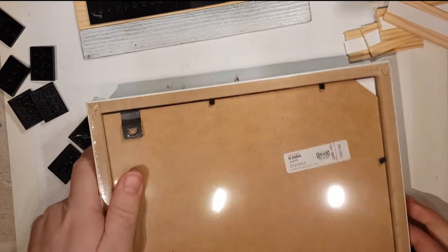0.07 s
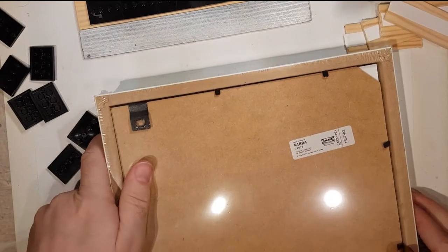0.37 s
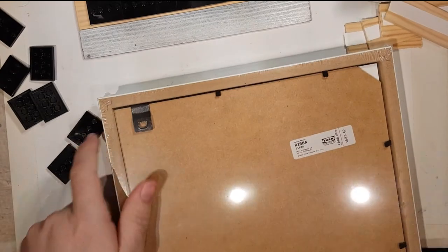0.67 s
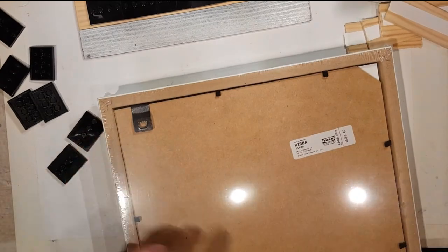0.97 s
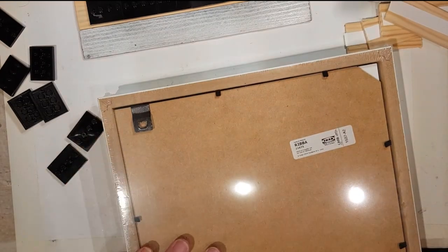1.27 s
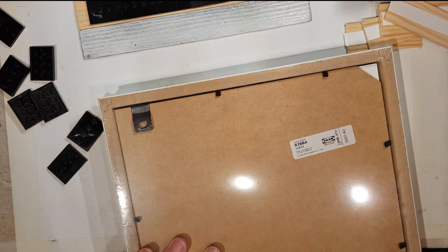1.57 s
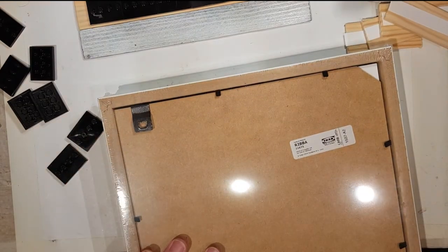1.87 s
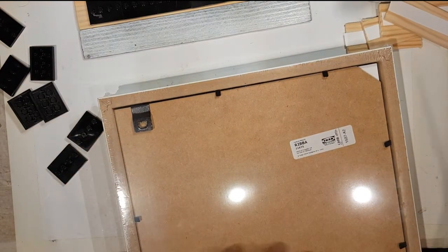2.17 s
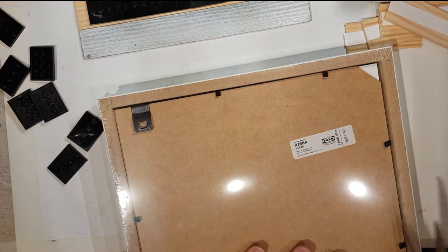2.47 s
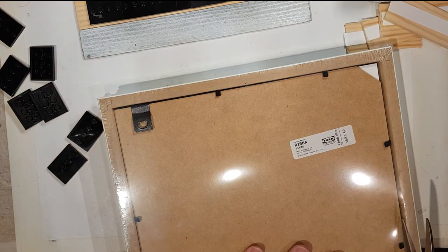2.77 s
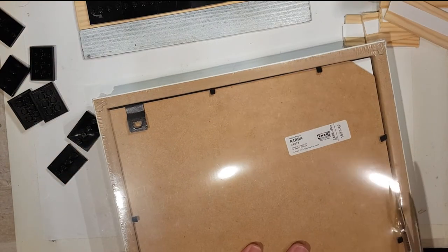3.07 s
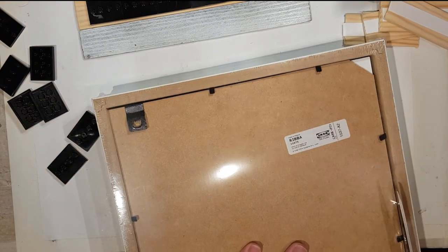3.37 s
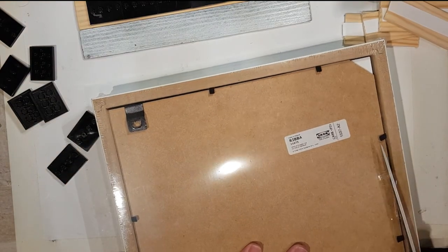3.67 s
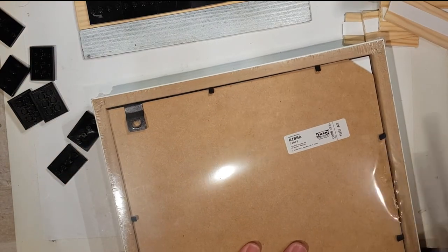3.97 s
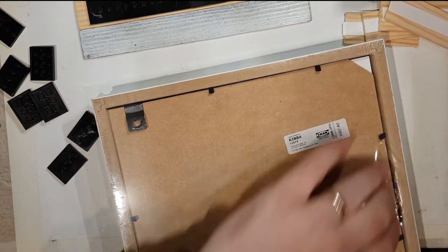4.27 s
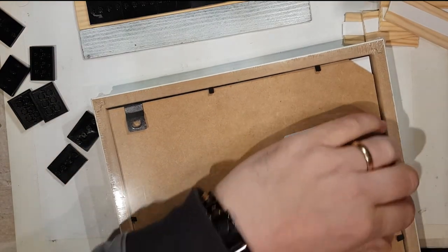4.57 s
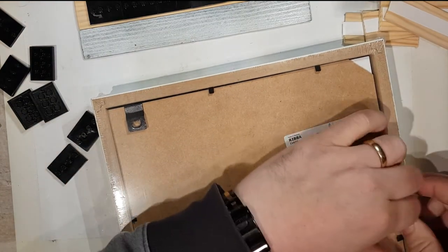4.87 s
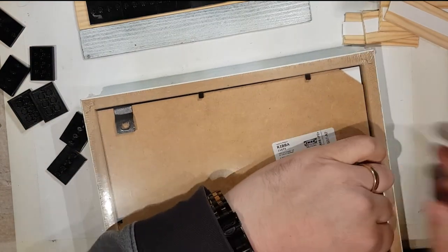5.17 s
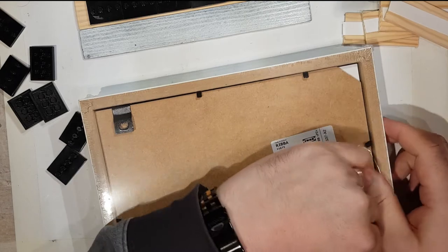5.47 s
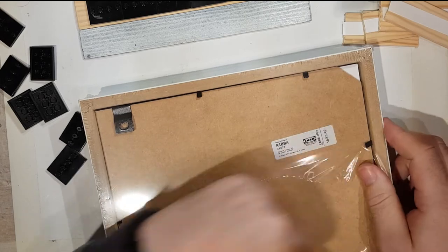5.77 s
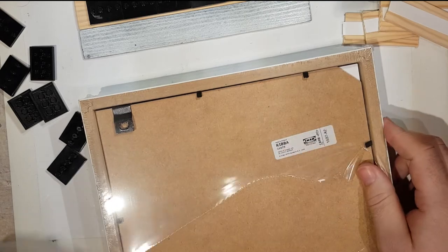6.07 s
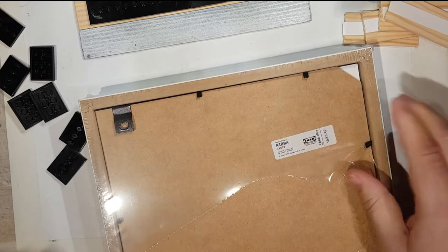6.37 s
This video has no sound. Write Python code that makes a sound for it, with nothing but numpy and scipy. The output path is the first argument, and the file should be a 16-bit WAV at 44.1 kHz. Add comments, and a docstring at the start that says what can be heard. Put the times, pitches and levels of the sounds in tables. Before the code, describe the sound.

Plastic film rustles briefly, and a shrink-wrapped wooden picture frame knocks a few times as it is laid on a table. Lighter taps follow. Fingers rub and pick at the taut wrap, which crackles and gives small sharp snaps, growing busier. Near the end a strip tears in one quick rip that shakes the loose sheet. Everything is heard close up in a small, quiet room.

```python
"""Plastic film rustles under someone's hands, then a shrink-wrapped wooden picture frame knocks
as it is laid face down on a table, close by in a small room. Frame and backing board ring at each
blow. Fingers rub and pick at the taut film until its creases snap. Near the end a strip of film
is torn across the back in a quick run of slips that shake the loose sheet."""
import sys
import numpy as np
from scipy import signal
from scipy.fft import rfft, irfft, next_fast_len
from scipy.io import wavfile

SR = 44100
rng = np.random.default_rng(int(sys.argv[2]) if len(sys.argv) > 2 else 0)


def unload_audio(sound):
    """Save the sound as a 16-bit wav file, at the path given as the first command line argument."""
    columns = np.transpose(np.atleast_2d(sound))
    # keep every value between -1 and 1, then stretch to whole-number steps
    steps = np.round(np.clip(columns, -1, 1) * 32767)
    wavfile.write(sys.argv[1], SR, steps.astype(np.int16))


N = 283122
TIME = np.arange(N) / SR
SIZE = 2 ** 14  # samples in one blow and its ring
AGE = np.arange(SIZE) / SR  # seconds since a blow
BLOW_GAIN = np.sqrt(.03 * SR)  # a blow's level counts its energy as if spread over 30 ms
TEAR_START_S, TEAR_END_S = 5.58, 6.22

# edges of the six bands, bass to treble, that shape a blow: (frequency [Hz])
BAND_EDGES = [50, 200, 450, 1100, 3000, 8000, 16000]
# how unlike left and right are in scattered sound: (frequency [Hz], side over middle [dB])
STEREO_WIDTH = [(60, -16.5), (270, -10.5), (500, -8), (1000, -1.5), (4000, 0)]
# how board and room colour each knock and snap: (frequency [Hz], gain [dB])
BOARD_COLOUR = [(30, -11), (100, -6), (2800, 5.5), (4700, 7), (7300, 2.5), (9200, -4.5), (13000, -9.5),
                (16000, -20.5)]


def undb(db):
    """Turn decibels into a gain."""
    return 10 ** (np.asarray(db) / 20)


def unit(x):
    """Scale a sound to an average power of 1."""
    return x / np.sqrt(np.mean(x ** 2))


def unit_energy(x):
    """Scale a sound to a total energy of 1, averaged over its channels."""
    return unit(x) / np.sqrt(x.shape[-1])


def along(points, hz):
    """Read between (frequency, value) points, with octaves evenly spaced."""
    point_hz, value = np.transpose(points)
    return np.interp(np.log(np.maximum(hz, 1)), np.log(point_hz), value)


def colour(x, points):
    """Filter a sound by a curve of (frequency [Hz], gain [dB]) points."""
    size = next_fast_len(x.shape[-1] + SIZE // 8) // 2 * 2
    hz = np.arange(size // 2 + 1) * SR / size
    cepstrum = irfft(np.log(undb(along(points, hz))))
    # folding this in half makes the filter ring only after a click, never before it
    cepstrum[1:size // 2] *= 2
    cepstrum[size // 2 + 1:] = 0
    return irfft(rfft(x, size) * np.exp(rfft(cepstrum)))[..., :x.shape[-1]]


def resonate(x, hz, q):
    """Pass a sound through one resonance; a higher q makes it narrower."""
    return signal.lfilter(*signal.iirpeak(min(hz, 15000), max(q, 1), fs=SR), x)


def fade(t60):
    """A level that dies away by 60 dB in t60 seconds."""
    return np.exp(-np.log(1000) * AGE / max(t60, 1e-3))


def add(out, start_s, x):
    """Mix a sound in at a given time."""
    i = int(start_s * SR)
    out[:, i:i + x.shape[-1]] += x[:, :N - i]


def diffuse(size):
    """Stereo noise, alike on both sides in the bass and unrelated in the treble."""
    mid, side = rng.standard_normal((2, size))
    side = colour(side, STEREO_WIDTH)
    return np.array([mid + side, mid - side])


def direct(lag_samples=8):
    """A single click that arrives on the left just before the right."""
    out = np.zeros((2, SIZE))
    out[0, 0] = out[1, lag_samples] = 1
    return out


def tail(stretch=0.99, late_db=-36, late_t60=0.15):
    """The dense ring of board and room, longest in the bass, over a faint reverberation."""
    # how long they ring before stretching: (frequency [Hz], time to fade by 60 dB [s])
    ring_times = [(80, 0.38), (210, 0.24), (560, 0.17), (1470, 0.15), (3880, 0.17), (10200, 0.15)]
    hz = np.arange(SIZE // 2 + 1) * SR / SIZE
    noise, out = rfft(diffuse(SIZE)), 0
    for band_hz, t60 in ring_times:
        share = along([(f, float(f == band_hz)) for f, _ in ring_times], hz)
        out = out + irfft(noise * share) * (fade(t60 * stretch) + undb(late_db) * fade(late_t60))
    return unit_energy(out)


def ring(modes, scatter_db=3, detune=0.017, rise_s=0.00049):
    """An object's fading tones; each touch gives them a slightly different level, pitch and timing."""
    out = 0
    for hz, db, t60 in modes:
        louder, sharper, apart, shift = rng.standard_normal(4)
        phase = np.pi * shift + np.array([[apart], [-apart]]) * undb(along(STEREO_WIDTH, hz))
        tone = np.sin(2 * np.pi * hz * (1 + detune * sharper) * AGE + phase)
        out = out + undb(db + scatter_db * louder) * fade(t60) * tone
    return unit_energy(out * (1 - np.exp(-AGE / rise_s)))


def shape_blow(x, spectrum, db, weight_db, contact_hz, bass_hz=524, softness_slope=4.1):
    """Set a blow's level in each band: weight adds bass, a softer contact takes away treble."""
    edges = np.array(BAND_EDGES)
    centres = np.sqrt(edges[1:] * edges[:-1])
    bass_db = weight_db / (1 + (centres / bass_hz) ** 2)
    dulling_db = 10 * np.log10(1 + (centres / contact_hz) ** softness_slope)
    wanted_db = db + along(spectrum, centres) + bass_db - dulling_db
    for _ in range(3):  # each pass brings the bands closer to their levels
        power = 2 * np.abs(rfft(x.mean(0))) ** 2 / (SIZE * BLOW_GAIN ** 2)
        bands = np.split(power, edges * SIZE // SR)[1:-1]
        now_db = 10 * np.log10([band.sum() for band in bands])
        x = colour(x, np.c_[centres, wanted_db - now_db])
    return x


def in_room(x, direct_db, patchy_db, place_count=12):
    """Clicks heard directly and through board and room; the ring changes as the contact moves."""
    hz = np.geomspace(100, 16000, 44)
    places = []
    for ripple_db in patchy_db * rng.standard_normal((place_count, len(hz))):
        response = undb(direct_db) * direct(lag_samples=4) + tail()
        places.append(unit_energy(colour(response, np.c_[hz, ripple_db])))
    out, step = np.zeros((2, N)), int(.03 * SR)
    for i in range(0, N, step):
        place = places[rng.integers(place_count)]
        if x[i:i + step].any():
            add(out, i / SR, signal.fftconvolve(x[None, i:i + step], place))
    return out


def grains(per_second, spread_db):
    """Tiny random clicks, a few much larger than the rest."""
    size = undb(spread_db * np.minimum(rng.exponential(size=N), 5))
    return (rng.random(N) < per_second / SR) * size * rng.choice([-1, 1], N)


def stroke(start_s, length_s, attack_s=.04, release_t60=0.34):
    """The strength of one hand movement: it gets going, holds, then dies away."""
    attack = np.clip((TIME - start_s) / attack_s + .5, 0, 1)
    since_end_s = np.maximum(TIME - start_s - length_s, 0)
    return attack * np.exp(-np.log(1000) * since_end_s / release_t60)


def room_tone(level_db=-62.5):
    """The faint steady air of the room."""
    # a low hush: (frequency [Hz], gain [dB])
    air_colour = [(25, -12.5), (45, 1.5), (110, 0), (220, -20.5), (700, -18), (1400, -21.5), (5000, -27.5),
                  (13500, -28.5), (16000, -33.5)]
    return unit(colour(diffuse(N), air_colour)) * undb(level_db)


def hands(rumble_db=-1, rub_db=-5, rustle_db=1, strip_db=-35, rub_per_pressure=0.46, strip_per_pull=0.74):
    """Skin drags over the film: fine creases crackle; pressed fingers rub and make the board rumble."""
    # hand movements: (start [s], length [s], level [dB], pressure on the board [dB])
    strokes = [(0.0, 0.01, -41.5, -4.5), (0.057, 0.22, -53.5, -0.5), (0.42, 0.4, -59.5, 2.5),
               (0.85, .22, -73, 9), (1.173, 0.032, -64, 13), (1.825, 0.65, -63.5, -2),
               (2.49, 0.38, -65.5, 2), (2.914, 0.21, -49.5, -3), (3.119, 0.084, -54, 13),
               (3.274, 0.2, -56.5, -30), (3.428, 0.096, -47, -1), (3.492, 0.22, -41.5, -3),
               (3.735, 0.14, -57.5, 18), (3.816, 0.031, -32, -2.5), (3.915, .12, -49, -20),
               (4.321, 0.35, -48.5, 0.5), (4.757, 0.073, -50, 7.5), (4.868, 0.038, -41.5, -0.5),
               (4.916, .19, -40.5, -4.5), (5.02, 0.069, -58, 21.5), (5.218, .07, -50.5, -8.5),
               (5.329, 0.06, -33.5, -16), (5.4, 0.057, -35, 1), (5.521, 0.14, -45.5, -21),
               (6.225, 0.091, -39.5, -15.5)]
    # tone of the board, the skin and the film, each: (frequency [Hz], gain [dB])
    rumble_colour = [(30, -16.5), (45, 2), (100, 1.5), (200, -2.5), (380, -6), (600, -16.5), (1200, -41)]
    rub_colour = [(200, -32.5), (500, -1.5), (1500, 1), (2300, -3), (6000, -34)]
    rustle_colour = [(800, -30), (2000, -11), (4200, 0), (6500, -4.5), (9000, -9), (13000, -9.5),
                     (16000, -16)]
    rumble = rub = rustle = 0
    for start_s, length_s, db, pressure_db in strokes:
        motion = stroke(start_s, length_s) * undb(db)
        rustle = np.hypot(rustle, motion)  # overlapping strokes add their power
        rub = np.hypot(rub, motion * undb(rub_per_pressure * pressure_db))
        rumble = np.hypot(rumble, motion * undb(pressure_db))
    # the loose strip rustles while it is pulled
    strip = stroke(TEAR_START_S, TEAR_END_S - TEAR_START_S) * undb(strip_db + strip_per_pull * pull_db())
    drag = in_room(grains(per_second=1600, spread_db=3), direct_db=-4.5, patchy_db=4.5)
    crackle = in_room(grains(per_second=1600, spread_db=5.5), direct_db=-9.5, patchy_db=-1.0)
    board = unit(colour(drag, rumble_colour)) * rumble * undb(rumble_db)
    skin = unit(colour(drag, rub_colour)) * rub * undb(rub_db)
    film = unit(colour(crackle, rustle_colour)) * np.hypot(rustle * undb(rustle_db), strip)
    return board + skin + film


def knocks(push_db=-19, push_hz=900, tones_db=-8, favoured_t60=.11):
    """Wood meets table or finger with a short push; pane and backing board rattle up and ring out."""
    # blows on the frame: (time [s], level [dB], weight [dB], contact hardness [Hz],
    # favoured tone [Hz], that tone's relative level [dB], rattle build-up [s])
    blows = [(0.162, -25, -2, 3390, 354, 5.5, .003), (0.212, -29, -8, 600, 769, -4, 0.00089),
             (0.356, -32, -2.5, 450, 360, -30, 0.00098), (0.486, -21.5, -5, 7500, 108, -5, 0.0058),
             (0.858, -56, 2.5, 900, 117, 7, 0.0089), (1.305, -39, -7, 8000, 2430, 0, 0.0033),
             (1.354, -37.5, -6, 9500, 1430, -1.5, 0.00095), (1.390, -51, 2.5, 9000, 368, 10.5, 0.0014),
             (1.682, -41, -8, 3110, 112, -2, .0013), (1.695, -33.5, -7.5, 1490, 607, -5.5, 0.02),
             (1.913, -60, 10, 6000, 115, 7.5, 0.0042), (2.982, -42.5, 4.5, 10400, 360, 4, 0.013),
             (3.132, -48.5, 3, 13100, 114, 9, 0.0004), (3.303, -55, 20, 694, 268, 18.5, 0.0065),
             (3.614, -47.5, 18, 3600, 252, 13, .0009), (3.721, -37, 3.5, 3200, 291, 7.5, .0003),
             (3.827, -42.5, 4, 6000, 354, 3, 0.0038), (4.901, -50, 9, 5000, 360, 5, 0.0021),
             (5.014, -37.5, -5.5, 1480, 381, -1.5, 0.00056), (5.095, -60.5, 25.5, 12000, 93, 27.5, 0.017),
             (5.484, -33.5, -3.5, 4200, 359, 11, 0.00027)]
    # tones of frame and backing board: (pitch [Hz], level [dB], time to fade by 60 dB [s])
    frame_tones = [(115.9, -12, 0.35), (193.5, -1.5, 0.12), (360, -3.5, 0.12), (493.6, -7.5, 0.14),
                   (758, -13.5, 0.15), (973, -1, 0.024), (1199, -1, 0.09), (1702, -8.5, 0.25),
                   (1827, -8, 0.22), (2200, 1, 0.09)]
    # a perfectly hard knock: (frequency [Hz], level [dB])
    hard_knock = [(100, 2.5), (300, 0), (700, 1), (1800, -1), (4900, 1.5), (11300, -1)]
    out = np.zeros((2, N))
    push = unit_energy(signal.sosfilt(signal.butter(2, push_hz, fs=SR, output="sos"), direct()))
    for start_s, db, weight_db, hardness_hz, favoured_hz, share_db, build_s in blows:
        rattle = unit_energy(tail(stretch=0.92) * (1 - np.exp(-AGE / build_s)))
        blow = undb(push_db) * push + rattle + undb(tones_db) * ring(frame_tones, detune=0.0092)
        knock = shape_blow(colour(blow, BOARD_COLOUR), hard_knock, db, weight_db, hardness_hz)
        # the spot that is hit favours one tone, which stands out of the dense ring
        favoured = BLOW_GAIN * undb(db + share_db) * ring([(favoured_hz, 0, favoured_t60)], detune=0)
        add(out, start_s, knock + favoured)
    return out


def table_sway(landing_s=0.486, level_db=-32.5):
    """The table top sways as the weight of the frame comes to rest on it."""
    # the table's deep tone: (pitch [Hz], level [dB], time to fade by 60 dB [s])
    table_tone = [(41, 0, 0.52)]
    out = np.zeros((2, N))
    add(out, landing_s, BLOW_GAIN * undb(level_db) * ring(table_tone, rise_s=.02))
    return out


def scuffs(q=1.17):
    """A fingertip skids a short way: a swell of tiny slips in one broad resonance of film or board."""
    # fingertip skids: (start [s], length [s], centre frequency [Hz], level [dB])
    skids = [(0.755, 0.07, 1700, -55), (1.966, 0.1, 5260, -58.5), (2.124, 0.099, 6200, -67),
             (2.223, 0.11, 11840, -59), (2.317, 0.043, 4370, -49), (2.325, 0.096, 2340, -55),
             (2.358, 0.013, 9500, -44), (2.577, 0.075, 5200, -54), (2.649, 0.066, 5540, -55),
             (3.635, 0.082, 900, -45.5), (4.629, 0.3, 444, -48.5), (5.115, 0.017, 2950, -39.5),
             (5.724, 0.0096, 1540, -28)]
    out = np.zeros((2, N))
    for start_s, length_s, hz, db in skids:
        swell = np.hanning(int(length_s * SR))
        slips = rng.standard_normal(len(swell)) * swell
        skid = unit(resonate(resonate(slips, hz, q), hz, q))
        room = unit_energy(direct() + tail())
        add(out, start_s, signal.fftconvolve(skid[None], room) * undb(db))
    return out


def snaps(film_db=-11, crease_q=10.0, click_db=-14, flutter_t60=0.026):
    """A crease pops through: a few cycles at its own pitch, a flutter, then film, board and room ring."""
    # popping creases: (time [s], level [dB], jolt to the board [dB], sharpness [Hz],
    # crease pitch [Hz], crack over its tail [dB])
    pops = [(2.895, -58, 17, 11000, 5220, -7), (2.962, -52, 11, 10100, 4400, -19),
            (3.407, -54.5, -49, 16000, 4800, -2), (3.583, -47, -6, 14200, 5850, -5.5),
            (3.702, -43.5, 2, 14000, 4690, -3), (3.843, -39, 4, 4650, 4570, -8),
            (3.866, -35, -6.5, 7000, 3950, 4.5), (3.872, -33.5, -39, 3620, 3730, -3),
            (3.9456, -39.5, 2, 10140, 4500, -10), (3.9593, -35, -0.5, 8500, 5200, -0.5),
            (4.3333, -38.5, 4, 13360, 7760, -5), (4.374, -44.5, 2, 2660, 3420, -8),
            (4.411, -46.5, 9.5, 2200, 3520, -8), (4.4852, -34, -3.5, 7500, 3820, -1),
            (4.521, -44, 0, 5500, 3550, -3), (4.5641, -34.5, 0, 3000, 2060, 3),
            (4.6214, -51, 8.5, 3300, 2070, -10), (5.0656, -51, 10, 5500, 3270, 0),
            (5.4913, -39, 10, 15000, 4700, 0), (6.276, -46.5, -5.5, 16100, 7360, -16),
            (6.326, -47, -30, 15860, 5070, 2)]
    # tones of the taut film: (pitch [Hz], level [dB], time to fade by 60 dB [s])
    film_tones = [(2690, 2, 0.083), (3630, 7.5, 0.045), (4640, 12, 0.1), (4600, -10, 0.072)]
    # a perfectly sharp snap: (frequency [Hz], level [dB])
    sharp_snap = [(100, -8.5), (300, -2.5), (700, -2), (1800, 1), (4900, 7.5), (11300, 1.5)]
    out = np.zeros((2, N))
    for start_s, db, jolt_db, sharpness_hz, crease_hz, crack_db in pops:
        flutter = unit_energy(diffuse(SIZE) * fade(flutter_t60))
        push = unit_energy(direct() + undb(-crack_db) * flutter)  # a cleaner pop flutters less
        crack = unit_energy(resonate(push, crease_hz, crease_q) + undb(click_db) * push)
        pop = undb(crack_db) * crack + tail(stretch=0.8) + undb(film_db) * ring(film_tones)
        add(out, start_s, shape_blow(colour(pop, BOARD_COLOUR), sharp_snap, db, jolt_db, sharpness_hz))
    return out


def pull_db(full_s=5.916, eases_s=6.079, rise_db_per_s=55, fall_db_per_s=116):
    """The tearing pull builds, holds at full strength (0 dB) and lets go."""
    return -rise_db_per_s * np.maximum(full_s - TIME, 0) - fall_db_per_s * np.maximum(TIME - eases_s, 0)


def tear(level_db=-26.5, spike_hz=3200, spike_db=-8, rip_db=-1.5, fray_db=-6, flap_per_pull=1.25):
    """The film gives way in quick slips; each is a sharp dip in pressure and shakes the loose sheet."""
    # the tear slows briefly, then speeds up: (time [s], slip rate [1/s])
    tear_speed = [(5.73, 126), (5.78, 63.6), (5.95, 93), (6.0, 166), (6.06, 170), (6.24, 196)]
    # tone of the slips and of the flapping sheet, each: (frequency [Hz], gain [dB])
    slip_colour = [(100, -7), (900, 1), (3500, -6), (5000, -17), (7000, -13), (15000, -26)]
    flap_colour = [(45, -16), (105, 1.5), (200, -5.5), (280, -2.5), (360, 4), (440, -7.5), (800, -12.5),
                   (1500, -36)]
    scatter_db, halting_rate = 0.5, 16  # unevenness of the slips' size and timing
    speed = np.interp(TIME, *np.transpose(tear_speed))
    slips, slip_s = np.zeros(N), TEAR_START_S
    for wait, size in rng.standard_normal((200, 2)):
        if slip_s < TEAR_END_S:
            i = int(slip_s * SR)
            slips[i] = -undb(scatter_db * min(size, 1)) / np.sqrt(speed[i])
            # a slow tear is halting, a fast one runs evenly
            slip_s += np.exp(wait * halting_rate / speed[i]) / speed[i]
    tearing = (TIME > TEAR_START_S) & (TIME < TEAR_END_S)
    spikes = unit(signal.sosfilt(signal.butter(2, spike_hz, fs=SR, output="sos"), slips))
    # between the slips the edge frays in much smaller steps
    fraying = unit(tearing * grains(per_second=700, spread_db=3.5))
    shaken = in_room(unit(slips) + undb(fray_db) * fraying, direct_db=-9.5, patchy_db=3.0)
    rip = undb(spike_db) * spikes + undb(rip_db) * unit(colour(shaken, slip_colour))
    sheet = unit(colour(shaken, flap_colour))
    gain = np.sqrt(tearing.mean()) * undb(level_db)  # the level counts only the time spent tearing
    return gain * (rip * undb(pull_db()) + sheet * undb(flap_per_pull * pull_db()))


def scene(left_over_right_db=1.5):
    """Mix all the sounds, slightly left of centre."""
    mix = knocks() + table_sway() + snaps() + scuffs() + hands() + tear() + room_tone()
    return mix * undb(np.array([[left_over_right_db], [-left_over_right_db]]) / 2)


def record(dry, bottom_hz=34, top_hz=15800):
    """Drop the deepest bass, hold peaks at full scale and cut the highest treble."""
    trimmed = signal.sosfilt(signal.butter(3, bottom_hz, "high", fs=SR, output="sos"), dry)
    return signal.sosfilt(signal.ellip(8, .2, 70, top_hz, fs=SR, output="sos"), np.clip(trimmed, -1, 1))


dry = scene()
out = record(dry)
unload_audio(out)
```